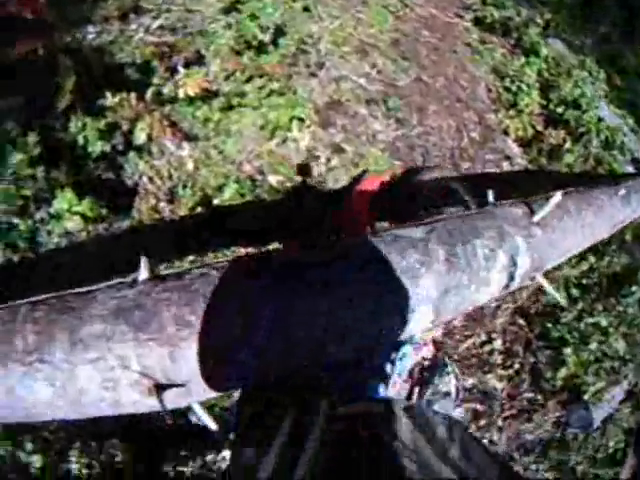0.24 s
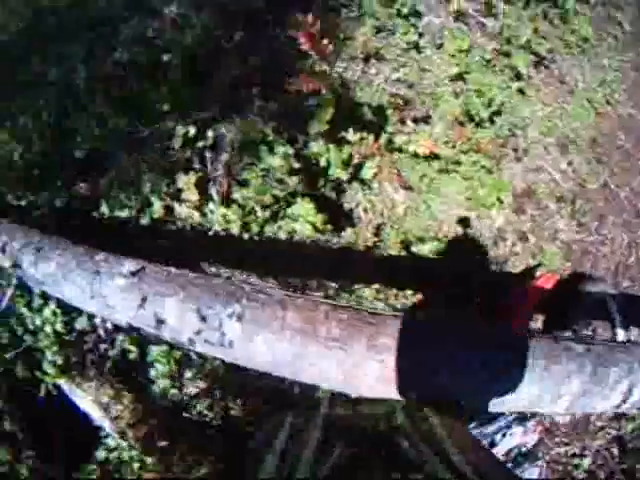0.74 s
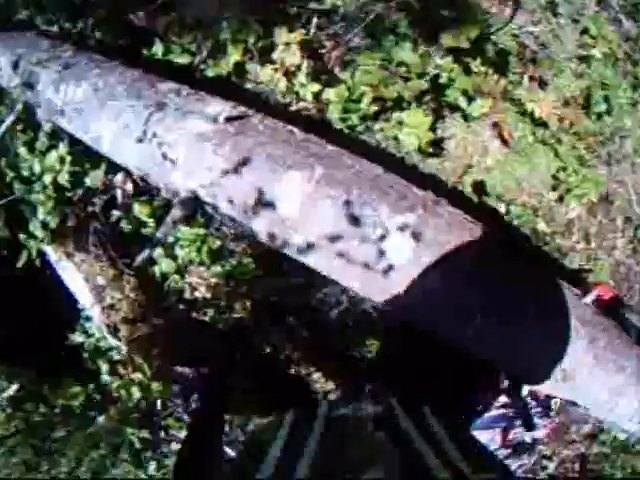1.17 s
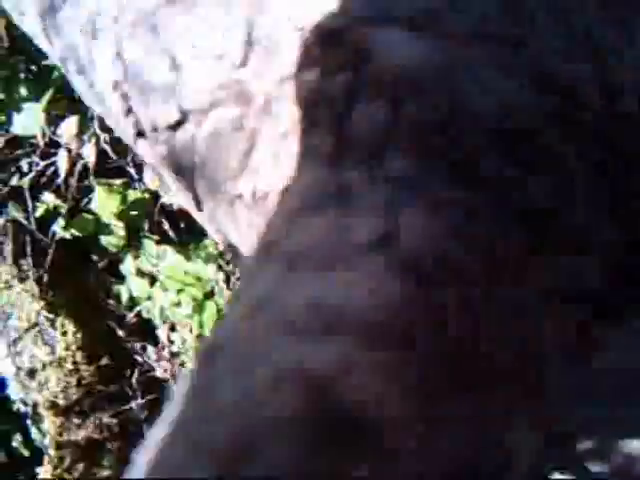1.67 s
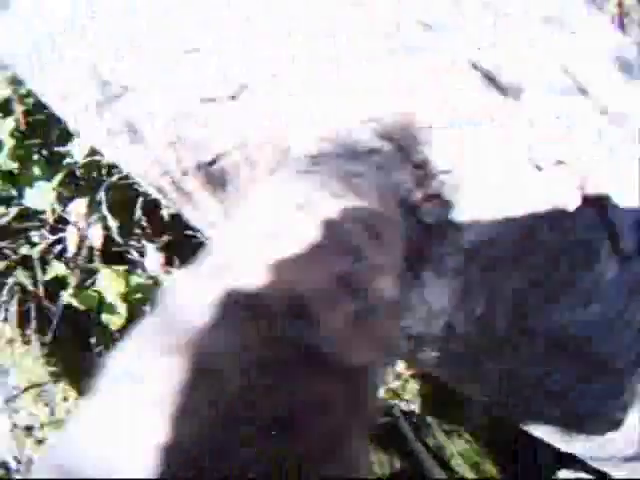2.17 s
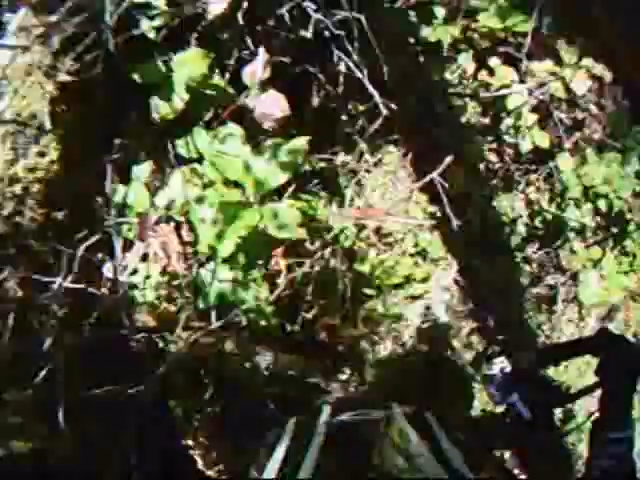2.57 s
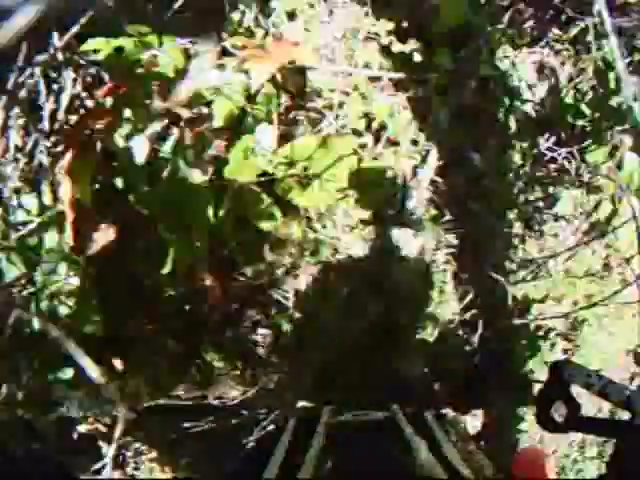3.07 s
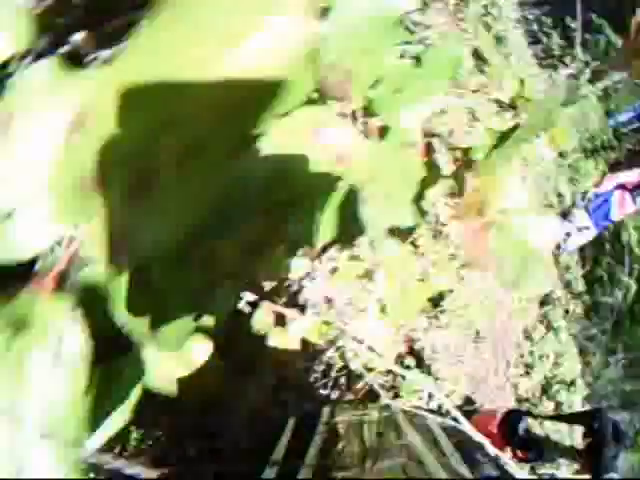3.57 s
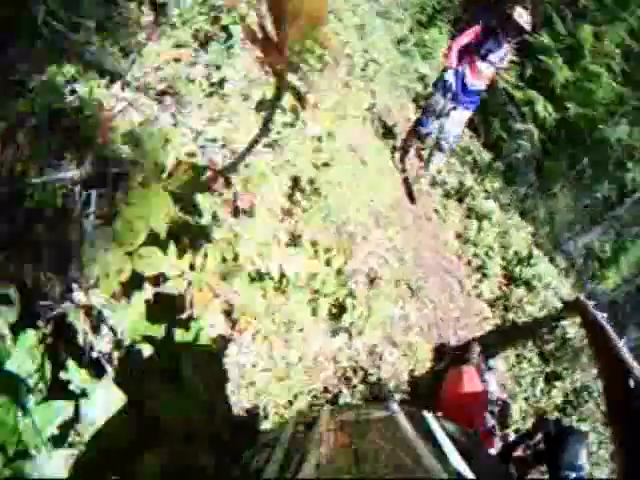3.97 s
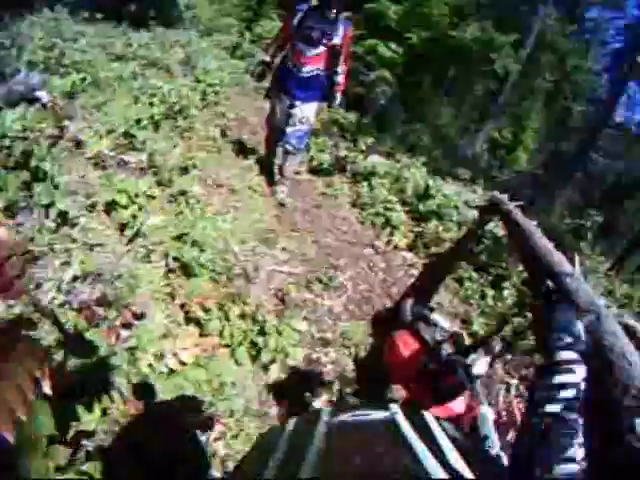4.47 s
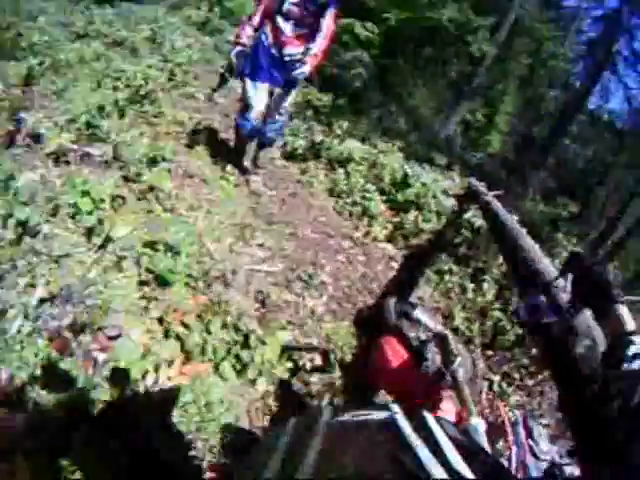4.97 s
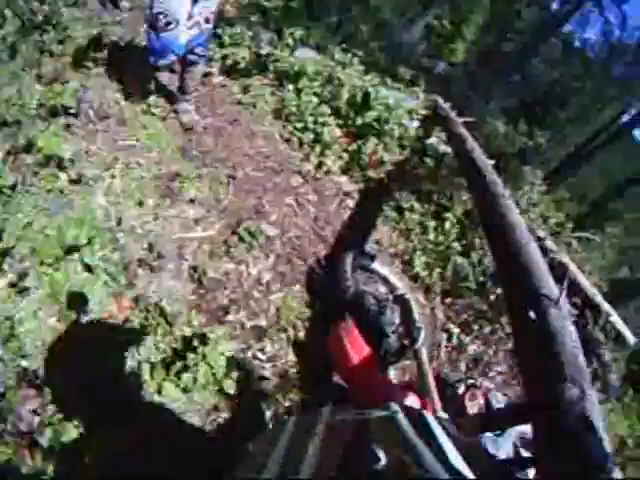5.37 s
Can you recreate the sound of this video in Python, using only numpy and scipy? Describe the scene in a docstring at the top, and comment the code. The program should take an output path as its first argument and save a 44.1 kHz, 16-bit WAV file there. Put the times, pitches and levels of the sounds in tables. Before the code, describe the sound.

Hard distorted thuds and bark cracks burst from a quiet hush as a helmet hits a fallen log, then brushwood scrapes and snaps against the camera.

```python
"""A rider's helmet bangs into a fallen log and judders along the bark, overloading the microphone.
Blows are damped pressure steps with noisy cracks; bark, twigs and leaves are tiny friction slips
ringing the mount, the camera case and the helmet shell.
Small dry ticks, three soft hoots, a faint forest hush and slow pressure swings fill the quiet."""
import sys
import numpy as np
from scipy import signal
from scipy.io import wavfile
from scipy.ndimage import uniform_filter1d

SR = 44100
rng = np.random.default_rng(int(sys.argv[2]) if len(sys.argv) > 2 else 0)


def wrap_up_sound(samples):
    """Save the sound to the file named by the first command line argument, as 16-bit audio."""
    columns = np.atleast_2d(samples).T
    # keep every value between -1 and 1, then stretch to whole-number steps
    tamed = np.clip(columns, -1, 1)
    steps = np.round(tamed * 32767).astype(np.int16)
    wavfile.write(sys.argv[1], SR, steps)


N = 248724
TIME = np.arange(N) / SR  # s

# Forest hush and air pressure spectra. Each row: frequency in Hz, relative density in dB per Hz.
FOREST_SPECTRUM = [(50, -7), (85, -2.5), (200, -13), (300, -18.5), (520, -23), (1200, -26.5), (2000, -26),
                   (3000, -25.5), (4000, -31.5), (5200, -30), (8000, -43), (11300, -35), (13000, -43.5)]
SWAY_SPECTRUM = [(4, -24.5), (12, 1.5), (25, -3), (42, -5.5), (70, -19.5), (160, -35.5), (500, -74.5),
                 (2000, -100)]
# Head movement pumping air at the microphone. Each row: time in seconds, rms level in dB.
SWAY_LEVEL = [(0, -53.5), (1.25, -56), (1.5, -54), (2.33, -36.5), (2.5, -47.5), (3.02, -47.5), (3.4, -34.5),
              (3.53, -47), (3.92, -37), (4.18, -51), (4.66, -49), (4.78, -39.5), (4.87, -47), (5.64, -54)]
# Faint hoots. Each row: start in seconds, length in seconds, top pitch in Hz,
# droop at the ends as a share of that pitch, peak level in dB.
HOOT_CALLS = [(.05, .18, 484, .12, -70), (.18, .18, 660, .01, -76), (5.3, .26, 568, .26, -71)]
# Small dry ticks nearby. Each row: start in seconds, relative peak in dB.
TICK_TIMES = [(0.164, -49.5), (0.3486, -49), (0.388, -43), (0.5513, -49.5), (0.596, -47), (0.6488, -47.5),
              (0.7546, -47), (0.827, -51), (0.8838, -45.5), (0.9183, -47), (0.9543, -45.5), (1.0375, -48),
              (1.0941, -48), (1.1468, -49), (1.2129, -45.5), (1.2215, -45), (1.2508, -45.5), (1.3302, -47),
              (1.3751, -43), (1.3893, -44), (1.5252, -46), (2.394, -45), (2.4323, -43.5), (2.9493, -47.5),
              (4.15, -45), (4.7072, -42.5), (5.2733, -46), (5.4902, -47.5), (5.578, -45.5), (5.591, -41)]
# Spectrum of a dry tick. Each row: frequency in Hz, relative density in dB per Hz.
TICK_SPECTRUM = [(300, -8.5), (900, -2.5), (1600, 0.5), (3000, 4.5), (5200, -1), (8000, -17), (11300, -6.5),
                 (13000, -11)]
# Single twigs and stalks slipping off the case. Each row: start in seconds, relative level in dB,
# length in seconds, wood ring against case ring in dB.
TWIG_SLIPS = [(.222, -54.5, 0.0047, -15), (1.867, -34.5, 0.0017, 6), (1.899, -42.5, 0.0022, 2),
              (1.969, -44.5, 0.0048, -19), (2.083, -38, 0.0072, -28), (2.212, -32.5, 0.0063, -20),
              (3.059, -32, 0.003, 0.5), (3.077, -32.5, 0.0034, -2), (3.089, -33.5, 0.0039, 2),
              (3.108, -30, 0.01, 3), (3.159, -33, 0.0044, -5), (3.213, -24, 0.013, 4),
              (3.235, -22, 0.0074, -6.5), (3.261, -28, 0.0016, -2.5), (3.331, -29, 0.0073, -17),
              (3.351, -31, 0.0064, 11), (3.381, -33.5, .02, -8), (3.418, -23, 0.0077, -6.5),
              (3.456, -28, 0.012, -15.5), (3.473, -32, 0.0089, -5), (3.596, -33, 0.0052, -2.5),
              (3.74, -36.5, 0.011, -9), (3.787, -38, 0.012, -10), (3.859, -29.5, .0061, -19),
              (3.897, -37, 0.012, -28), (3.951, -40, 0.014, -10), (4.585, -42, 0.0063, -15),
              (4.968, -46, 0.0086, -11)]
# Resonances of the camera case, then of the twigs. Each row: frequency in Hz,
# width of one filter pass in Hz, relative gain in dB.
CASE_MODES = [(647.4, 58, -2.5), (1140, 160, -6), (1590, 56, -17.5), (1846, 540, 4), (2170, 446, 6.5),
              (2304, 240, 5), (2499, 232, 8.5), (2900, 990, -9), (4110, 810, -13), (5577, 376, 2),
              (5995, 390, -4.5), (6130, 170, -35), (10270, 1180, -8), (10600, 370, -41.5),
              (12470, 290, -18)]
WOOD_MODES = [(538, 450, 2), (1180, 440, -1), (1430, 95, 1), (1906, 370, -4.5), (4300, 820, -4.5),
              (12460, 1400, -15)]
# Hard blows on the helmet. Each row: start in seconds, relative level in dB, swing in Hz,
# time to fall 60 dB in seconds.
HELMET_BLOWS = [(1.5656, -4.5, 47, 0.085), (1.5802, -2, 58, 0.06), (1.586, -13.5, 164, 0.17),
                (1.6199, -2.5, 62.8, 0.1), (1.6286, -0.5, 212.5, 0.0063), (1.6398, -3, 170.5, 0.0099),
                (1.6534, 2.5, 126.2, 0.05), (1.6705, 1, 87, 0.045), (1.6844, -2.5, 104.4, 0.048)]
# The loudest cracks of bark under the blows. Each row: start in seconds, level in dB, length in seconds.
BARK_CRACKS = [(1.571, -7, 0.0028), (1.597, -31, .0095), (1.6381, -13, 0.0028), (1.642, -26, .009),
               (1.655, -20.5, 0.0039), (1.6702, -11.5, .0019), (1.684, -16, .0022), (1.6859, -6, 0.0026)]
# Spectrum of cracking bark. Each row: frequency in Hz, relative density in dB per Hz.
BARK_SPECTRUM = [(200, -11), (700, -0.5), (2000, 3), (4000, -2), (6200, -6.5), (7500, -11), (12500, -13)]
# Low groan of the helmet and mount, the pressed mount itself, and its thin ringing under load.
# Each row: frequency in Hz, width of one filter pass in Hz, relative gain in dB.
GROAN_MODES = [(195, 50, 11.5), (243, 40, 1.5), (380, 56, 0.5), (470, 170, 0.5), (605, 35, 4.5),
               (705, 96, 2.5), (830, 150, -9), (1040, 330, -10), (1204, 420, -12.5)]
MOUNT_MODES = [(1700, 750, 5.5), (2290, 700, 0), (3900, 1900, -11), (5300, 940, -4.5), (5980, 540, -10),
               (8400, 820, -13), (10300, 2300, -10.5), (12100, 460, -18)]
BUZZ_MODES = [(8060, 120, -1.5), (7910, 180, -3), (12080, 230, -16.5)]
# The helmet slides along the bark. Each row: start in seconds, length in seconds,
# relative grating level in dB, relative groan level in dB.
BARK_SLIDES = [(1.583, 0.021, -36, -31), (1.62, 0.081, -38, -23), (1.72, 0.021, -38.5, -34),
               (1.745, 0.063, -38.5, -29), (1.84, 0.1, -53.5, -52.5), (1.934, 0.01, -37.5, -34.5),
               (1.96, .12, -49, -49.5), (2.11, 0.22, -53.5, -51), (2.2, 0.025, -33.5, -22),
               (2.24, 0.039, -39.5, -29), (2.3, 0.046, -74, -64)]
# The helmet catches on the log and rebounds. Each row: start in seconds, level in dB,
# swing in Hz, time to fall 60 dB in seconds, rise time constant in seconds.
HELMET_THUDS = [(1.695, -2, 62.4, .1, .0022), (1.741, -7, 77, 0.25, 0.0064),
                (1.797, 2.5, 80.5, 0.09, 0.0019), (1.94, -4.5, 55.7, 0.075, 0.0038),
                (1.98, -14, 69, 0.13, .0022), (2.202, 4, 92.7, 0.15, 0.0086), (2.2435, -7, 99, .048, .0022),
                (2.268, -3, 67.8, 0.11, 0.002)]
# Leaves, then stiff twigs, dragged over the case. Each row: start in seconds, length in seconds,
# relative rub or scratch level in dB, relative helmet boom level in dB.
LEAF_STROKES = [(2.606, 0.029, -64, -58.5), (2.75, 0.12, -70, -66.5), (3.502, .02, -50.5, -66),
                (3.552, .08, -42, -50.5), (3.642, 0.13, -49.5, -51.5), (3.727, 0.051, -45, -53),
                (3.8, 0.039, -47.5, -46.5), (3.845, 0.052, -37, -41.5), (3.915, 0.022, -41, -43),
                (3.954, 0.056, -44, -50.5), (4.027, 0.051, -44.5, -54.5), (4.085, 0.11, -65, -70),
                (4.27, 0.6, -61.5, -72), (4.615, 0.062, -56.5, -49.5), (4.966, .035, -51, -52),
                (5.15, 0.037, -51, -45), (5.21, 0.2, -98, -67), (5.404, 0.056, -65.5, -54)]
TWIG_STROKES = [(3.032, 0.085, -55.5, -53), (3.108, 0.027, -42.5, -38.5), (3.162, 0.038, -39, -44),
                (3.198, 0.04, -32, -37.5), (3.28, 0.17, -42, -46), (3.353, 0.079, -35, -37.5),
                (3.462, 0.027, -46, -52)]
# Resonances of the helmet shell. Each row: frequency in Hz, width of one filter pass in Hz,
# relative gain in dB.
SHELL_MODES = [(114.5, 24, -3.5), (188, 46.6, -1), (237, 56, -13), (635, 30, -22), (698, 53, -18.5)]
# Soft bumps that make the shell boom. Each row: start in seconds, relative level in dB, pitch in Hz,
# time to fall 60 dB in seconds.
SHELL_BUMPS = [(2.612, -35.5, 183.5, 0.071), (3.214, -24, 189.7, 0.18), (3.235, -35.5, 193, 0.25),
               (3.415, -25.5, 183.6, 0.16), (3.81, -27, 186, 0.027), (3.862, -23.5, 188, 0.058),
               (4.588, -33.5, 187.4, 0.13), (4.974, -39, 190, 0.12), (5.114, -36, 195, 0.17),
               (5.178, -34.5, 191, 0.1)]
# Twigs that snap against the case. Each row: start in seconds, peak in dB.
TWIG_SNAPS = [(3.1775, -21), (3.2315, -15), (3.4197, -6)]
# Spectrum of a snap. Each row: frequency in Hz, relative density in dB per Hz.
SNAP_SPECTRUM = [(300, -38), (900, -33), (1500, 15), (2700, 8), (4000, -11.5), (5700, 3), (8000, -32.5),
                 (10500, 2), (13000, -43.5)]

FOREST_DB = -65.5  # hush before its slow flicker
FAINT_TICKS_PER_S, FAINT_TICK_DB = 9.2, -47.5
TWIG_SPREAD_OCT = 0.37  # each slipping twig rings up to this far above or below the wood table
CHIP_DB, CHIP_S = -24.5, 0.00078  # bark chip under every blow: dB against the blow, length in s
EDGE_HZ = 12900  # upper band limit


def amp(db):
    """Turns dB into a gain."""
    return 10 ** (np.asarray(db) / 20)


def evened(x):
    """Scales to rms 1."""
    return x / np.sqrt(np.mean(x ** 2) + 1e-20)


def of_length(x, length):
    """Scales a short sound so its energy equals rms 1 over the given length."""
    return x / np.sqrt(np.sum(x ** 2) / (length * SR))


def add(mix, s, sound):
    """Lays a sound into the mix at time s."""
    part = mix[round(s * SR):][:len(sound)]
    part += sound[:len(part)]


def level(rows):
    """Draws a dB curve as a gain over time."""
    return amp(np.interp(TIME, *np.transpose(rows)))


def colour(x, points):
    """Filters with the given spectrum, minimum phase so that nothing sounds early."""
    hz, db = np.transpose(points)
    grid = abs(np.fft.fftfreq(8192, 1 / SR))
    log_gain = np.log(amp(np.interp(np.log(grid + 1), np.log(hz), db)))
    response = np.fft.ifft(np.exp(np.conj(signal.hilbert(log_gain)))).real
    return signal.fftconvolve(x, response[:len(grid) // 2])[:len(x)]


def ring(x, modes):
    """Passes x through parallel resonances, each twice for steep skirts."""
    out = 0
    for hz, width, db in modes:
        section = np.concatenate(signal.iirpeak(hz, hz / width, SR))
        out = out + amp(db) * signal.sosfilt([section, section], x)
    return out


def wander(per_s):
    """Drifts at rms 1 along straight lines between random points, per_s of them a second."""
    return evened(np.interp(TIME * per_s, np.arange(N), rng.standard_normal(N)))


def friction(grains_per_s, spread_db, clump_db, clumps_per_s, hiss):
    """Bunches tiny uneven slips over a smooth rub, then evens the level over about 70 ms."""
    size = amp(spread_db * np.minimum(rng.exponential(1, N), 4)) * rng.choice([-1, 1], N)
    grains = evened(size * (rng.random(N) < grains_per_s / SR))
    rub = grains + hiss * rng.standard_normal(N)
    force = rub * amp(clump_db * wander(clumps_per_s))
    return force / np.sqrt(uniform_filter1d(force ** 2, size=3000) + 1e-9)


def strokes(rows, column, attack_s, sag_db_per_s, release_s):
    """Shapes sliding contacts: each bites, sags (or swells if negative), and dies away on letting go."""
    power, t = np.zeros(N), TIME[:SR // 2]
    for row in rows:
        s, length = row[:2]
        attack = 1 - np.exp(-t / attack_s)
        release = np.exp(-np.maximum(t - length, 0) / release_s)
        add(power, s, (amp(row[column] - sag_db_per_s * t) * attack * release) ** 2)
    return np.sqrt(power)


def burst(length, rise):
    """Runs uneven micro-slips that build up, then stop as the contact is lost."""
    u = TIME[:4096] / length  # time as a share of the length, as is rise
    slip_noise = rng.standard_normal(len(u)) * amp(4.5 * rng.standard_normal(len(u)))
    return slip_noise * (1 - np.exp(-u / rise)) / (1 + u ** 8)


def swings(rows):
    """Swings the helmet as a damped sine for each row."""
    out, t = np.zeros(N), TIME[:SR // 4]
    for s, db, hz, t60, rise_s in rows:
        decay = amp(db - 60 * t / t60)
        add(out, s, decay * np.sin(2 * np.pi * hz * t) * (1 - np.exp(-t / rise_s)))
    return out


def clicks(rows, spectrum, scatter, scatter_s):
    """Makes sharp clicks, each an impulse with a short decaying scatter of noise."""
    out, t = np.zeros(N), TIME[:2048]
    for s, db in rows:
        noise = scatter * rng.standard_normal(len(t)) * np.exp(-t / scatter_s)
        click = colour((t == 0) + noise, spectrum)
        add(out, s, amp(db) * click / abs(click).max())
    return out


def air():
    """Faint flickering forest hush, and slow pressure swings as the head moves."""
    hush = evened(colour(rng.standard_normal(N), FOREST_SPECTRUM)) * amp(0.9 * wander(per_s=13))
    sway = evened(colour(rng.standard_normal(N), SWAY_SPECTRUM)) * level(SWAY_LEVEL)
    return amp(FOREST_DB) * hush + sway


def hoots():
    """Soft pure tones that swell and fade while their pitch arches."""
    out = np.zeros(N)
    for s, length, top_hz, droop, db in HOOT_CALLS:
        u = np.linspace(-1, 1, round(length * SR))
        pitch = top_hz * (1 - droop * u ** 2)
        tone = np.sin(2 * np.pi * np.cumsum(pitch) / SR)
        add(out, s, amp(db) * np.cos(u * np.pi / 2) * tone)
    return out


def dry_ticks():
    """Placed ticks mingle with others of one level whose random gaps are exponential."""
    times = np.cumsum(rng.exponential(1 / FAINT_TICKS_PER_S, 100))
    faint = [(s, FAINT_TICK_DB) for s in times if s < N / SR]
    placed = [(s, db + 1.0) for s, db in TICK_TIMES]
    return clicks(placed + faint, TICK_SPECTRUM, scatter=0.21, scatter_s=0.004)


def slips():
    """A twig slipping off rings both the case and its own wood, at a pitch of its own."""
    out = np.zeros(N)
    for s, db, length, wood_db in TWIG_SLIPS:
        run = burst(length, rise=0.043)
        stiffness = 2 ** rng.uniform(-TWIG_SPREAD_OCT, TWIG_SPREAD_OCT)
        wood = [(min(hz * stiffness, EDGE_HZ), width, gain_db) for hz, width, gain_db in WOOD_MODES]
        sound = ring(run, CASE_MODES) + amp(wood_db) * ring(run, wood)
        add(out, s, amp(db) * of_length(sound, length))
    return out


def collision():
    """Each blow is a sudden step of pressure that swings back; bark cracks and gives way under it."""
    out, t = np.zeros(N), TIME[:SR // 8]
    for s, db, hz, t60 in HELMET_BLOWS:
        step = np.cos(2 * np.pi * hz * t) * (1 - np.exp(-(t / 0.00041) ** 2))
        add(out, s, amp(db + 2.5) * step * amp(-60 * t / t60))
    release = -amp(3.5) * (t / 0.00017) * np.exp(-t / 0.00051)  # the load drops as the bark yields
    chips = [(s, db + CHIP_DB, CHIP_S) for s, db, hz, t60 in HELMET_BLOWS]
    for s, db, length in list(BARK_CRACKS) + chips:
        crack = of_length(colour(burst(length, rise=0.39), BARK_SPECTRUM), length)
        add(out, s, amp(db) * crack)
        add(out, s + length / 2, amp(db) * release)
    return out + amp(-22.5) * ring(out, GROAN_MODES)


def bark_scrape():
    """Bark grates and crumbles while the helmet judders; hard swings set the mount buzzing."""
    force = friction(grains_per_s=3500, spread_db=2.0, clump_db=4.0, clumps_per_s=180, hiss=0.8)
    crumbs = friction(grains_per_s=1200, spread_db=3.5, clump_db=-0.5, clumps_per_s=260, hiss=0.45)
    mount = amp(-1.5) * evened(ring(force, MOUNT_MODES))
    crumble = amp(-3.5) * evened(colour(crumbs, BARK_SPECTRUM))
    grating_level = strokes(BARK_SLIDES, column=2, attack_s=0.0035, sag_db_per_s=22, release_s=0.02)
    grating = grating_level * (mount + crumble)
    groan_level = strokes(BARK_SLIDES, column=3, attack_s=0.003825, sag_db_per_s=31, release_s=0.013)
    groan = groan_level * evened(ring(force, GROAN_MODES))
    judder = swings(HELMET_THUDS)
    strain = uniform_filter1d(abs(judder), size=400)  # swing size over about 9 ms
    buzz = amp(-34) * strain * evened(ring(force, BUZZ_MODES))
    return grating + groan + judder + buzz


def shell_boom(force, rows):
    """The helmet shell hums under whatever rubs it."""
    boom_level = strokes(rows, column=3, attack_s=0.0077, sag_db_per_s=5, release_s=0.02)
    return boom_level * evened(ring(force, SHELL_MODES))


def leaves():
    """Leaves rub the case with a finer, softer grain; their stalks ring a little."""
    force = friction(grains_per_s=700, spread_db=2.5, clump_db=2.0, clumps_per_s=170, hiss=0.59)
    rub = evened(ring(force, CASE_MODES) + amp(-13.5) * ring(force, WOOD_MODES))
    rub_level = strokes(LEAF_STROKES, column=2, attack_s=0.0048, sag_db_per_s=14.5, release_s=0.0089)
    return rub_level * rub + shell_boom(force, LEAF_STROKES)


def bumps():
    """Soft bumps swing the shell and wake a higher resonance of it a little."""
    swing = swings([(*row, 0.002) for row in SHELL_BUMPS])  # rise time constant in s
    return swing + amp(23.5) * ring(swing, [(660, 122, 0.0063)])


def twigs():
    """Twigs catch and slip on the case in coarse, uneven scratches."""
    force = friction(grains_per_s=500, spread_db=5, clump_db=3.5, clumps_per_s=240, hiss=0.35)
    scratch = evened(ring(force, CASE_MODES) + amp(-4.0) * ring(force, WOOD_MODES))
    scratch_level = strokes(TWIG_STROKES, column=2, attack_s=0.0038, sag_db_per_s=-13.5, release_s=0.018)
    return scratch_level * scratch + shell_boom(force, TWIG_STROKES)


def snaps():
    """A snapping twig is an impulse with a dense scatter that dies within milliseconds."""
    return clicks(TWIG_SNAPS, SNAP_SPECTRUM, scatter=1.0, scatter_s=0.0012)


def scene():
    """Sums the forest, the helmet on the log, and the brushwood on the case."""
    forest = air() + hoots() + dry_ticks()
    log = collision() + bark_scrape()
    brushwood = slips() + leaves() + bumps() + twigs() + snaps()
    return (forest + log + brushwood)[None]


def record(dry):
    """The microphone overloads softly near full scale; then the treble is cut at the band limit."""
    squashed = dry / (1 + dry ** 6) ** (1 / 6)
    lowpass = signal.firwin(401, EDGE_HZ, window=("kaiser", 7), fs=SR)
    return signal.oaconvolve(squashed, lowpass[None], "same")


dry = scene()
out = record(dry)
wrap_up_sound(out)
```